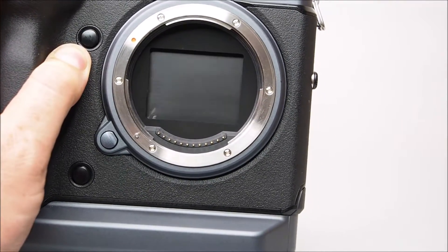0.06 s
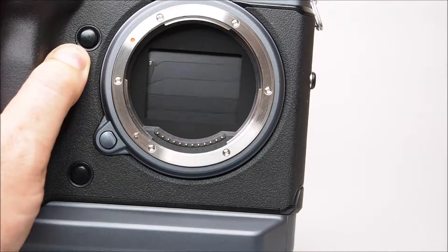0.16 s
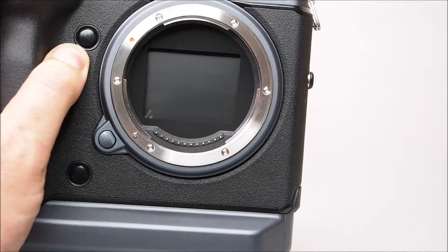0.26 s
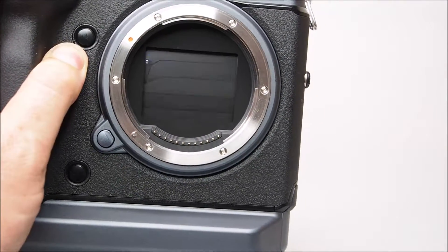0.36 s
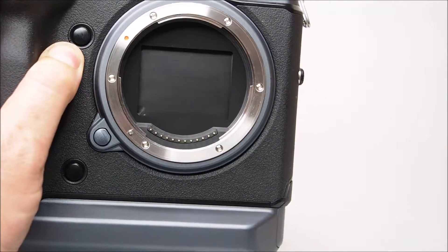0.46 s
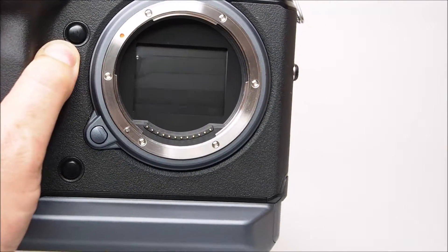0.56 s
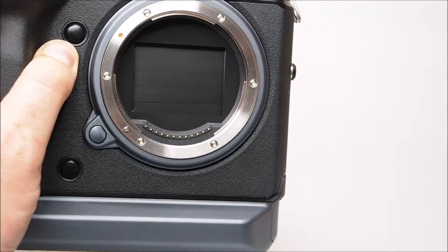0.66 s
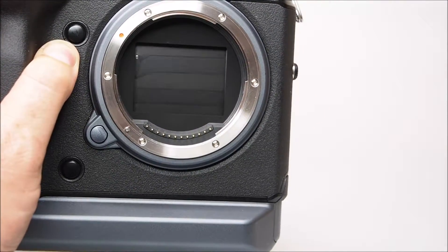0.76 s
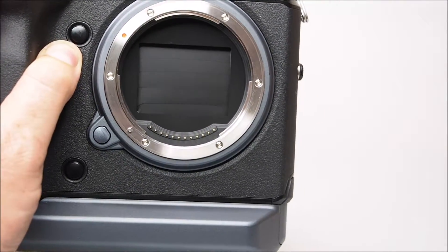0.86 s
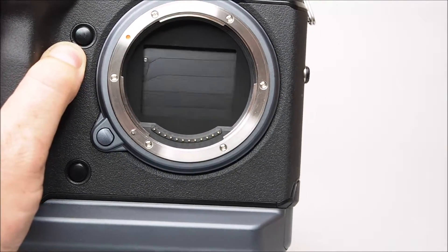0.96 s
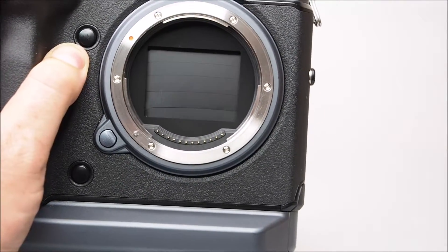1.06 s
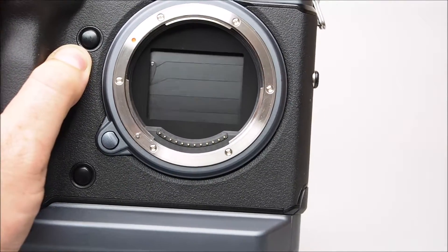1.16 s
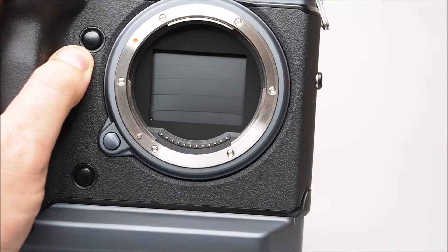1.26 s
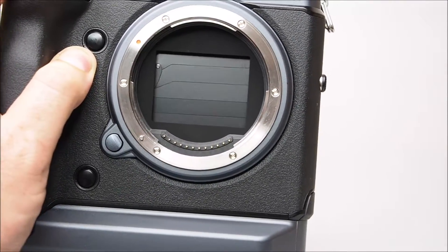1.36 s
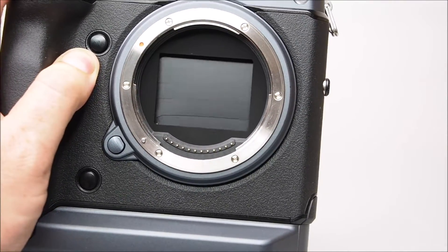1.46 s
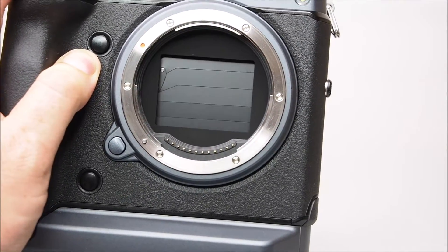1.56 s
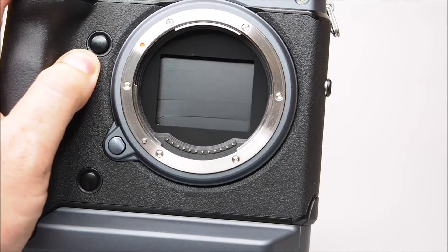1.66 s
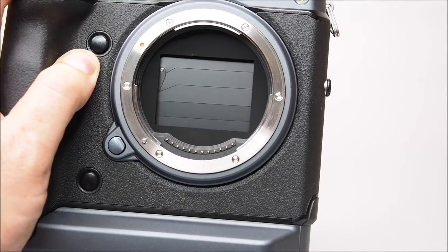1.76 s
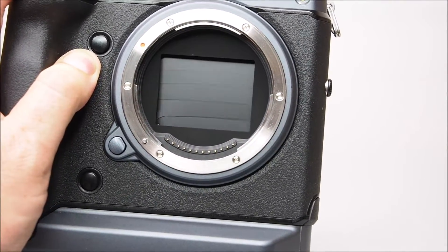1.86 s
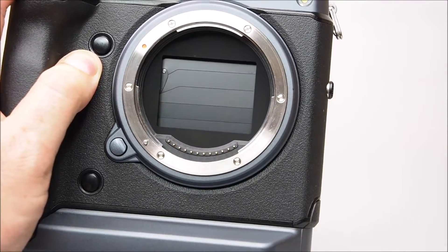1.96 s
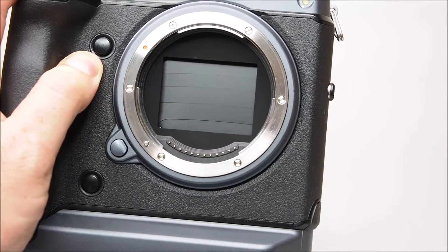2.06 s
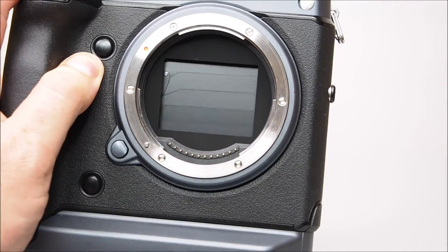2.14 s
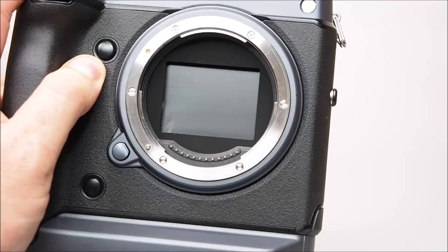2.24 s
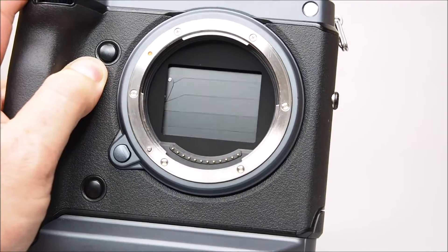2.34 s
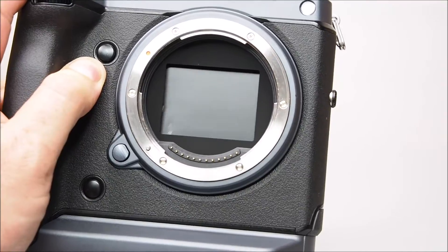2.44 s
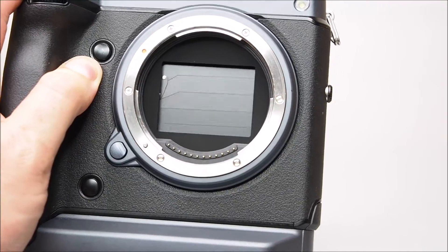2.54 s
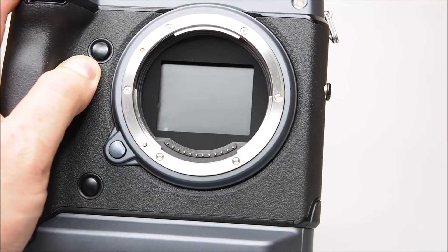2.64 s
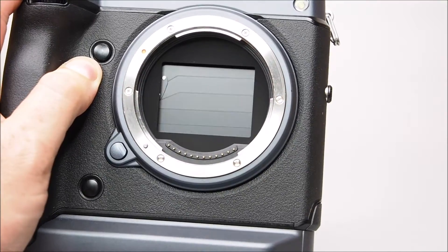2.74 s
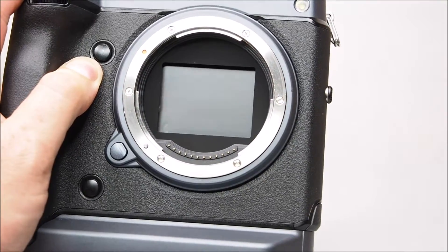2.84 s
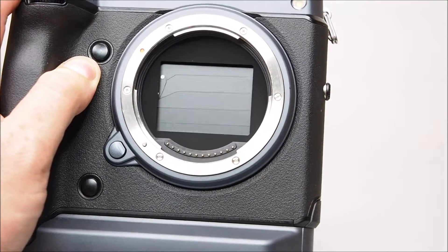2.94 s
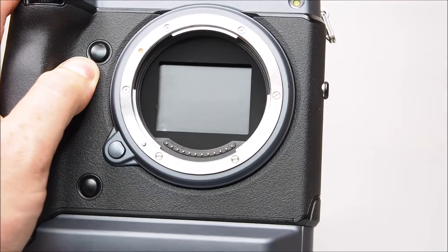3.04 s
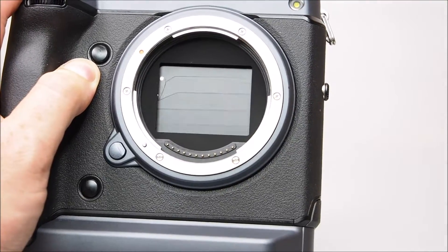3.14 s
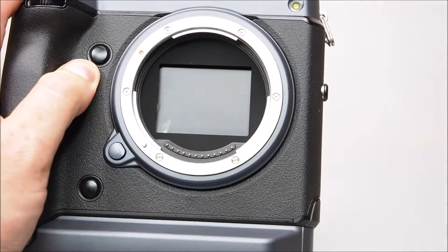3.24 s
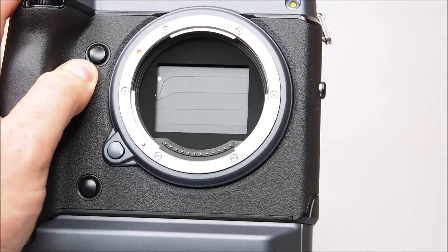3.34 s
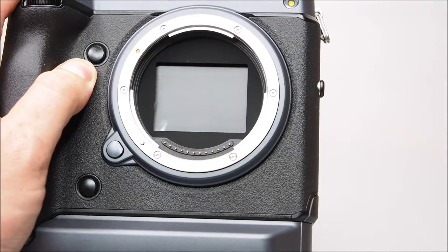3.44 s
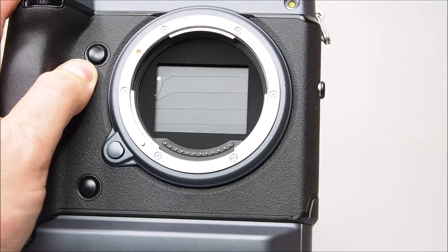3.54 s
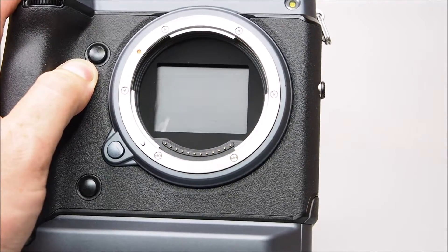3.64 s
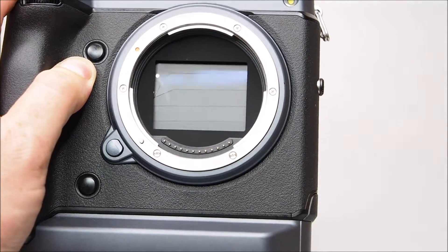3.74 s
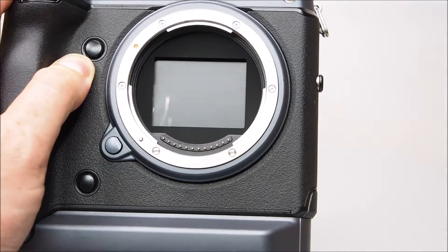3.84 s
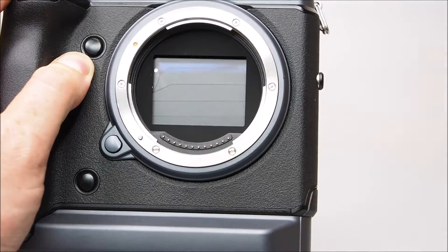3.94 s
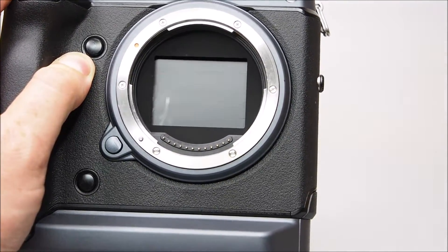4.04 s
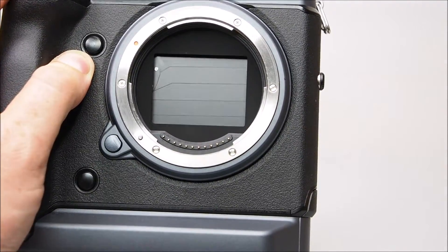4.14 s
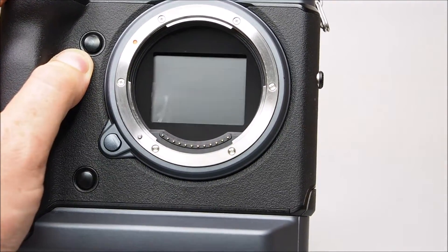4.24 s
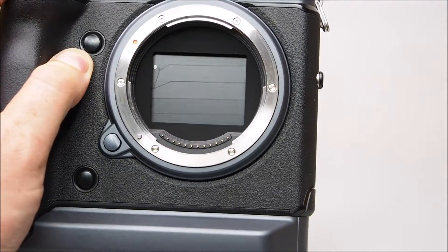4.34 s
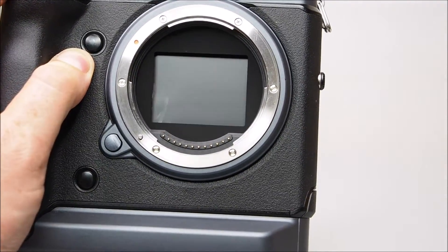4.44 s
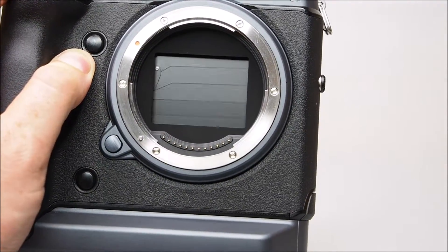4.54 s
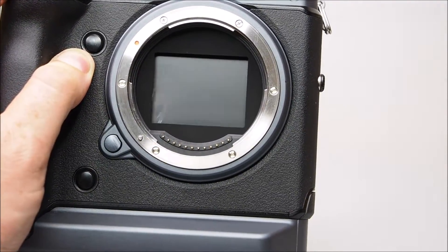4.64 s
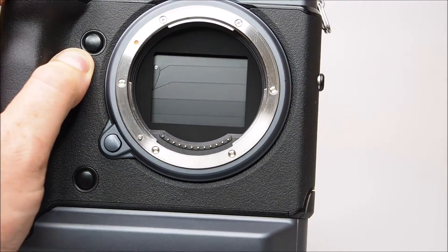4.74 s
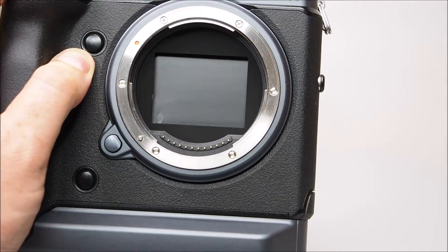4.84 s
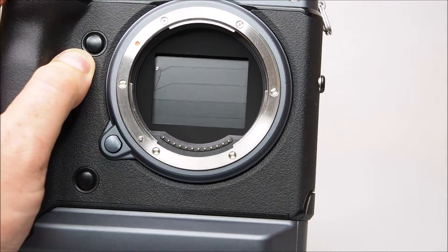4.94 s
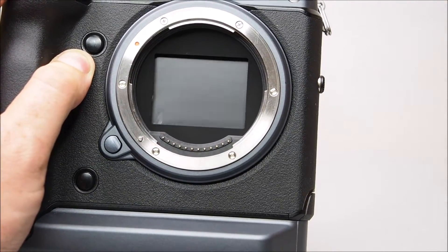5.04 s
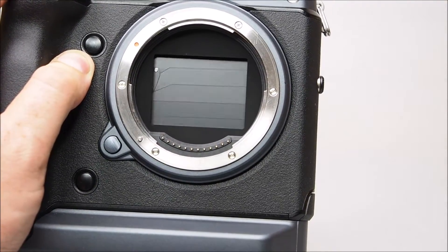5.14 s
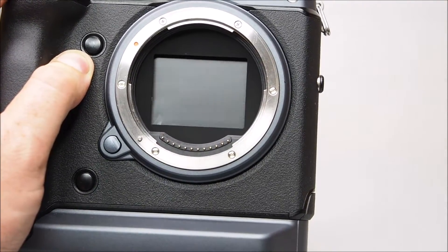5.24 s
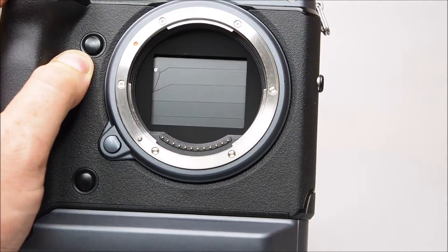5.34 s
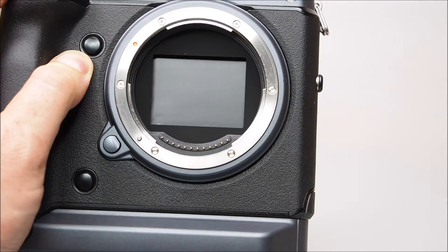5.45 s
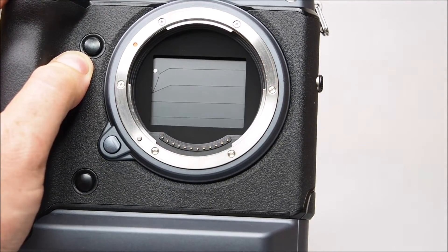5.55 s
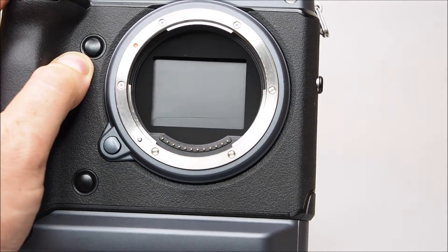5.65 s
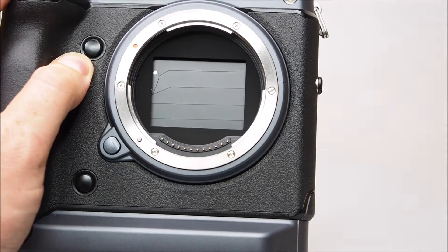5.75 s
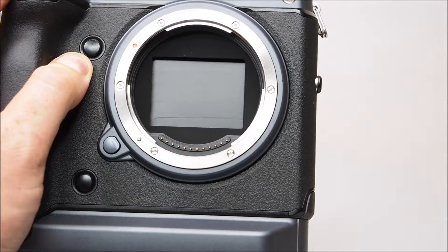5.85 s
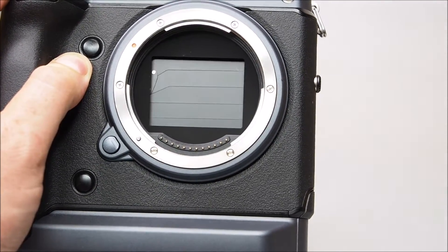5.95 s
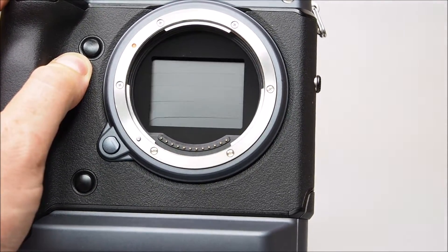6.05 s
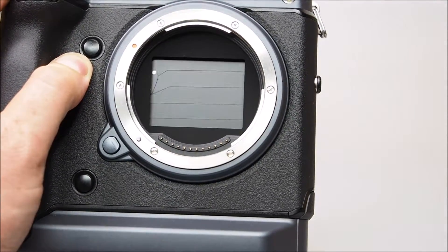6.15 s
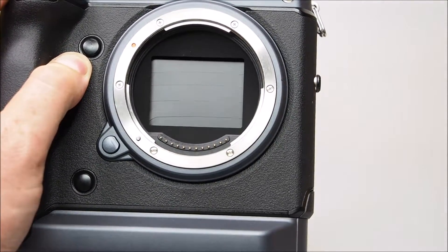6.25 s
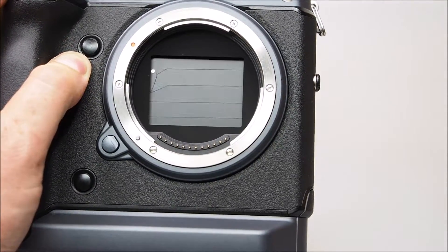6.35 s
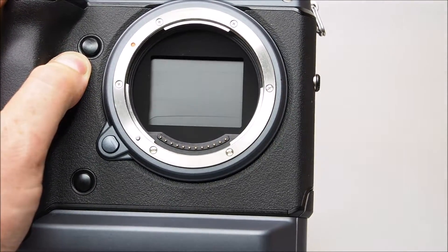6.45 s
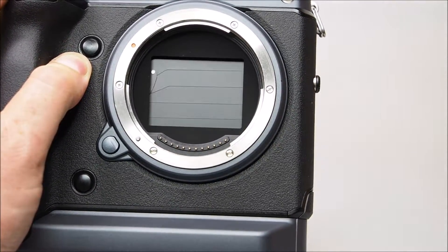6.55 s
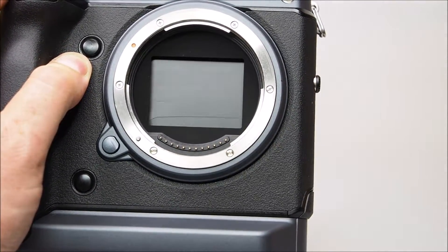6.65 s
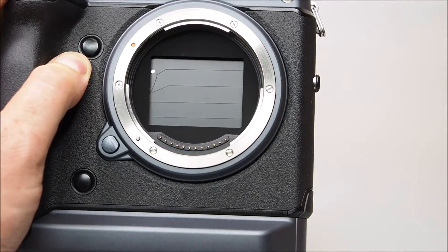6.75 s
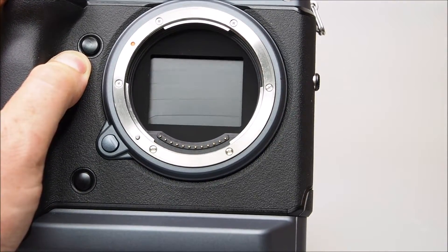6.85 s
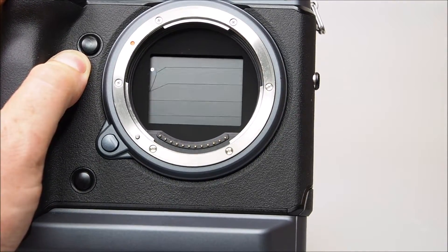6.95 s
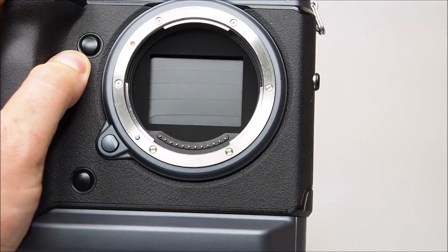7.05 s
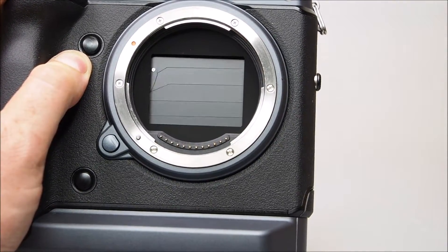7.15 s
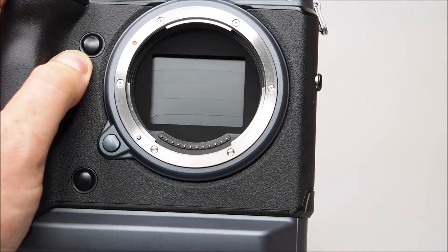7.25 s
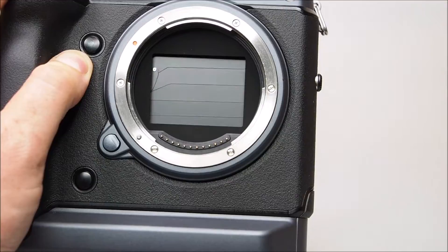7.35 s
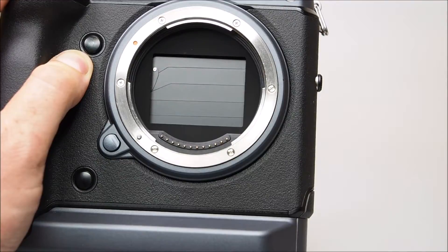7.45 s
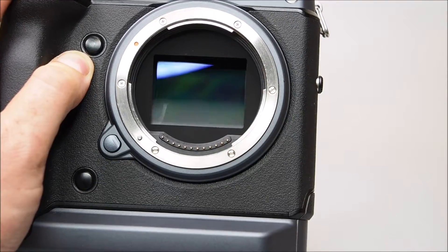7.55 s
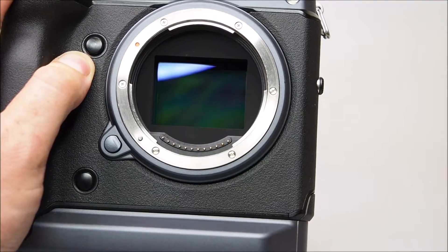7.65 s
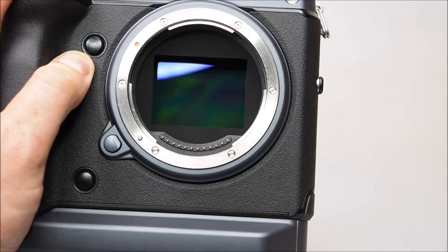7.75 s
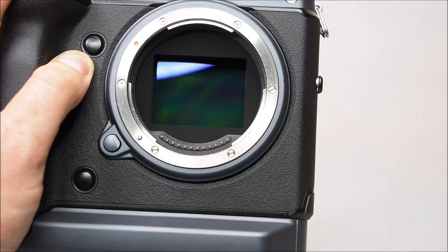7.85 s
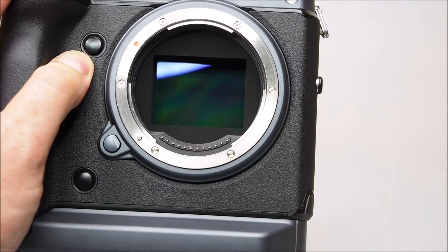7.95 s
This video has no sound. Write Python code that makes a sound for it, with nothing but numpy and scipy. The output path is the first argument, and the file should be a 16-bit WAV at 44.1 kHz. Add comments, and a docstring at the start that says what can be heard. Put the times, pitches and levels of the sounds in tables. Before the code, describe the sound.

A camera's mechanical shutter fires a steady burst, five sharp metallic clacks a second with tiny motor whirs between, then a click and short whir.

```python
"""A mirrorless camera with no lens fires its focal-plane shutter five times a second, close by in a small room.
For each frame a whining motor winds and latches the springs, the first curtain snaps away, and the second
slams shut and bounces. Later a catch lets go and the motor winds the shutter open.
Hits are short bursts of noise coloured by the camera body; the motor is a wavering tone over grainy noise.
Behind it lie rumble and hiss made of filtered noise, and a low humming tone."""
import sys
import numpy as np
from scipy import signal
from scipy.fft import rfft, irfft
from scipy.io import wavfile
from scipy.ndimage import uniform_filter1d, map_coordinates

SR = 44100
rng = np.random.default_rng(int(sys.argv[2]) if len(sys.argv) > 2 else 0)


def to_wav(sig):
    """Store sig (one row per channel, or 1-D mono) as 16-bit WAV at the path in sys.argv[1].

    Samples outside -1..1 are clipped; the rate is SR.
    """
    pcm = np.clip(np.atleast_2d(sig), -1, 1) * 32767
    pcm = np.round(pcm).astype(np.int16)
    wavfile.write(sys.argv[1], SR, pcm.T)  # frames by channels


N = 352800

# Timing: the beat has one more slam, a frame before the first one named here
FIRST_SLAM_S, FRAME_S, FRAME_COUNT = .1711, .1996, 37
# how far the slams run behind the even beat: t/s, lateness/ms
DRIFT = [(.17, -0.2), (.77, -2), (1.37, -1), (2.36, -6.5), (2.86, -6), (3.16, -2.5), (3.56, -1),
         (3.77, 6.5), (4.37, 4), (5.66, -1.93), (6.36, -0.5), (7.36, -0.1)]
MOTOR_AFTER_S, LATCH_AFTER_S = 0.076, .1453  # from a slam to the next motor start and spring latch
STOP_S, KNOCK_RISE_S = 0.00397, 0.0016  # from slam to cushioned stop; rise of the case's knock
OPEN_AFTER_S = .019  # from the catch to the opening stroke

# Hits: extra strength of each group, added to the levels in its table
SLAM_DB, BOUNCE_DB, LATCH_DB = -0.45, 1.07, -0.4
# metal contacts; t60 is the time to fade by 60 dB
# first curtain leaving: t/s from the slam, level/dB, t60/s
FIRST_CONTACTS = [(-.0099, -15, 0.0126), (-.0090, -18, 0.01), (-.0072, -16, .02), (-.0010, -41, .01)]
# second curtain slamming shut: t/s from the slam, level/dB, t60/s
SECOND_CONTACTS = [(0, -2.03, 0.0099), (.0008, -8, 0.013), (.0017, -10.5, 0.01)]
# second curtain bouncing: t/s from the slam, level/dB, t60/s
BOUNCE_CONTACTS = [(.0049, -18, 0.011), (.0058, -13.5, 0.016), (.0073, -18, 0.0135)]
# springs latching: t/s from the latch, level/dB, t60/s
LATCH_CONTACTS = [(-.0245, -21, 0.017), (-.0088, -16, 0.0122), (-.0018, -15, 0.013), (.0005, -17, 0.012)]
# catch letting go: t/s in the scene, level/dB, t60/s
CATCH_CONTACTS = [(7.5172, -19, 0.01), (7.5185, -12.5, 0.0067)]

# Colour of each part before the body shapes it; only the relative levels matter
# first curtain: f/Hz, level/dB per Hz
FIRST_TONE = [(60, -25), (430, -19), (900, -17.5), (1600, -18.5), (2800, -6.5), (4200, -3.5), (5700, -8),
              (7600, -5), (9500, -10), (12000, -8), (15500, -11.5)]
# second curtain: f/Hz, level/dB per Hz
SECOND_TONE = [(60, -79), (430, -20.5), (1000, -20), (2100, -22.5), (2900, -4.5), (3800, -17), (4900, -8),
               (5600, -1.5), (6200, -4), (7200, -3.5), (8500, -6), (9500, -16.5), (12000, -11),
               (15500, -18)]
# bounce: f/Hz, level/dB per Hz
BOUNCE_TONE = [(60, -16.5), (430, -23.5), (1100, -8), (2000, -3.5), (2800, -2.5), (4000, 0), (5700, -4.5),
               (7000, -10), (8500, -5.5), (9600, -3.5), (13000, -13), (15500, -20.5)]
# latch: f/Hz, level/dB per Hz
LATCH_TONE = [(60, -22), (430, -16.5), (800, -9.5), (1600, -23), (2200, -7.5), (3050, -5.5), (4300, -5),
              (5300, -2), (5950, 0), (7000, -3.5), (8400, -1.5), (9700, -8), (12200, -8), (15500, -19.5)]
# catch: f/Hz, level/dB per Hz
CATCH_TONE = [(200, -40), (1400, -39), (2000, -13), (2700, -24.5), (3400, -16.5), (4500, -15), (5600, -6.5),
              (6150, 2), (6800, -14.5), (8500, -10), (15000, -14)]
# gear noise: f/Hz, level/dB per Hz
GEAR_TONE = [(60, -21.5), (430, -11.5), (800, -11), (1600, -8), (2300, -5.5), (3000, -4), (4300, -3.5),
             (5800, -1.5), (7000, -5.5), (8300, -2.5), (9700, -7.5), (12200, -4.5), (15500, -10)]
# peaks and hollows on the way from the open lens mount to the microphone: f/Hz, width/Hz, level/dB
BODY = [(199, 65, -4.5), (394, 54, 1), (590, 62, -5), (693, 23.1, -6), (805, 64, 2.5), (1180, 46, 1),
        (1278, 41, -5.5), (1657, 115, -3.5), (2260, 120, -3.5), (3520, 100, 1), (3970, 99, -1),
        (5520, 110, 3), (6490, 154, -6.5), (10360, 320, -7)]
# ringing modes of the camera's case: f/Hz, level/dB, t60/s
CASE_MODES = [(338.5, -7, 0.07), (435, 0.5, 0.041), (638, -5, 0.034), (824, -12.5, 0.076), (935, -14, 0.02),
              (1206, -1, 0.07), (1450, -5.5, 0.094), (2077, -10, 0.057)]
BASS_CUT_HZ, TOP_HZ = 197, 15900  # so small a body radiates little bass; upper band limit

# Motor strokes: rise, moment of heaviest load and running time (attack, load, length)/s,
# share of speed lacking at the start (slow), levels of whine and gear noise (whine, rasp)/dB
# winding the springs
COCKING_STROKE = dict(attack_s=.018, load_s=.044, length_s=.075, slow=.22, whine_db=-30.5, rasp_db=-32.5)
# winding the shutter open
OPENING_STROKE = dict(attack_s=0.014, load_s=.04, length_s=0.061, slow=0.0098, whine_db=-25.5, rasp_db=-29.5)
FREE_MESH_HZ, SAG_HZ, LOAD_WIDTH_S = 2988, 239, 0.0161  # free-running gear pitch, its dip under load
SPIN_UP_S = .017  # how quickly the motor comes up to speed
ATTACK_DB, STOP_T60_S = 13, 0.029  # swell at the start; fade after the motor stops
WHINE_FADE_DB, RASP_GROWTH_DB = 4, 4  # as the springs tighten, whine gives way to rasp
# how strongly the gears radiate each overtone: f/Hz, level/dB
OVERTONES = [(2450, -13), (2680, -4.5), (2830, 1.5), (3100, -4), (5100, -2.5), (5550, -3), (6200, 0),
             (7600, -35.5), (8400, -12.5), (11500, -19.5)]

# Left and right
# likeness of the two sides for hits and gear noise: f/Hz, likeness 0-1
ALIKE = [(100, 1), (1500, 1), (2300, 0.77), (2900, 0.98), (4000, 0.39), (6000, 0.91), (7500, 0.59),
         (9000, 0.19), (12000, 0.42), (14000, 0.19)]
# left level minus right level: f/Hz, difference/dB
BALANCE = [(1000, -0.1), (2050, 1), (2550, -4.5), (3350, 1), (3800, -1), (5300, 0.5), (6100, 0.5),
           (6650, 7), (7300, 2), (8050, -2), (9000, 2), (11500, 1), (14500, 2.5)]

# Room
# how long its echoes last: f/Hz, t60/s
ROOM_T60 = [(200, 0.2), (450, 0.27), (850, 0.301), (1500, 0.19), (2800, 0.23), (4500, 0.2), (8000, 0.19),
            (15000, 0.19)]
# colour of its echoes: f/Hz, relative level/dB
ROOM_TONE = [(100, -3), (400, 4.5), (800, 6), (2200, 3), (2850, 0.5), (3500, 3.5), (4700, 2.5), (5600, 0),
             (6300, -1.5), (8000, 1), (15000, 1)]
# likeness of the two sides of its echoes: f/Hz, likeness 0-1
ROOM_ALIKE = [(300, 0.96), (1200, 0.77), (2300, 0.343), (4500, .05)]
# colour of its rumble and hiss: f/Hz, relative level/dB per Hz
AIR_TONE = [(12, -29), (20, 8.5), (27, -6.5), (66, 0.5), (144, -2.5), (219, -1), (298, -10), (491, -11.5),
            (581, -15), (1040, -16), (1580, -23.5), (5380, -24.5), (15500, -40)]
AIR_DB = -56  # before the rise
RISE_DB, RISE_AT_S, RISE_S = 9.5, 7.45, 0.17  # lifts air and hum alike after the burst
HUM_HZ, HUM_DB, HUM_WAVER_DB = 64, -67, 3  # level before waver, swell and rise
HUM_SWELL_DB, HUM_SWELL_AT_S, HUM_SWELL_S = 12, 6.64, 0.25

SHOT, LEAD = SR // 2, SR // 7  # samples that hold one frame's sound; of them, before the slam
CLOCK = (np.arange(SHOT) - LEAD) / SR  # seconds from the slam


def amp(db):
    """Turn decibels into gain."""
    return 10 ** (np.asarray(db) / 20)


def unit(x):
    """Scale to an average strength (rms) of 1."""
    return x / np.sqrt(np.mean(x ** 2) + 1e-20)


def along(points, hz):
    """Read a table of (frequency, value) with the frequency on a log axis."""
    f, v = np.transpose(points)
    return np.interp(np.log(hz + 1), np.log(f), v)


def bins(size):
    """Frequencies in the spectrum of a sound of size samples."""
    return np.fft.rfftfreq(size, 1 / SR)


def wobble(rate, size):
    """A smooth random curve through rate random points a second."""
    points = rng.standard_normal(int(size * rate / SR) + 4)
    return map_coordinates(points, [np.arange(size) * rate / SR])


def even(pair, size):
    """Level out the random peaks of a noise spectrum over size bins."""
    z = rfft(pair)
    power = np.abs(uniform_filter1d(np.abs(z) ** 2, size=size, axis=1))
    return irfft(z / np.sqrt(power))


def spread(pair, alike):
    """Mix two unrelated signals into left and right with a given likeness."""
    turn = np.arccos(np.clip(along(alike, bins(pair.shape[1])), -1, 1)) / 2
    mid, side = rfft(pair) * [np.cos(turn), np.sin(turn)]
    return irfft([mid + side, mid - side])


def add(track, sound, s):
    """Mix a sound into the track from time s on, cutting off what lies outside."""
    start = round(s * SR)
    lo, hi = max(start, 0), min(start + sound.shape[1], N)
    track[:, lo:hi] += sound[:, lo - start:hi - start]


def background():
    """Rumble and hiss of filtered noise under a low wavering hum; the hum swells once, and both rise late."""
    t = np.arange(N) / SR
    air = irfft(rfft(rng.standard_normal((2, N))) * amp(along(AIR_TONE, bins(N))))
    air = unit(spread(air, [(100, 0.89), (1000, 0.74), (4000, 0.18)]))  # f/Hz, likeness
    hum = unit(np.sin(2 * np.pi * HUM_HZ * t + .8 * wobble(10, N)))
    swell = np.exp(-((t - HUM_SWELL_AT_S) / HUM_SWELL_S) ** 2)
    hum_db = HUM_DB + HUM_WAVER_DB * wobble(3, N) + HUM_SWELL_DB * swell
    risen = np.clip((t - RISE_AT_S) / RISE_S, 0, 1)
    return amp(RISE_DB * risen) * (amp(AIR_DB) * air + amp(hum_db) * hum)


def slam_times():
    """An even beat that drifts by a few milliseconds, already under way at the start."""
    beat = FIRST_SLAM_S + FRAME_S * np.arange(-1, FRAME_COUNT)
    return beat + np.interp(beat, *np.transpose(DRIFT)) / 1000


def through_body(tone):
    """Filter from a part through the body to each side, of unit power, reacting only after a hit."""
    hz = bins(SHOT)
    db = along(tone, hz) + sum(g / (1 + ((hz - f) / w) ** 4) for f, w, g in BODY)
    db = db - 10 * np.log10(1 + (BASS_CUT_HZ / (hz + 20)) ** 4)
    sides_db = db + np.outer([.5, -.5], along(BALANCE, hz))
    gain = unit(amp(sides_db) * np.where(hz < TOP_HZ, 1, .1))
    # folding the cepstrum (spectrum of the log spectrum) puts the response after the hit
    cepstrum = irfft(np.log(gain))
    cepstrum[:, 1:SHOT // 2] *= 2
    cepstrum[:, SHOT // 2:] = 0
    return np.exp(rfft(cepstrum))


def ring(t60):
    """Thin blades have many evenly strong modes, so they ring like noise that dies in milliseconds."""
    fade = amp(-60 * np.arange(SR // 10) / SR / t60)
    burst = even(rng.standard_normal((2, len(fade))) * fade, size=31)
    strength = np.sqrt(np.mean(fade ** 2))
    return spread(unit(burst) * strength, ALIKE)[:, :len(fade) // 2]


def part(contacts, tone, fresh, scatter_s, scatter_db):
    """A moving part: gives a function that strikes it; fresh is the share of each hit's power that is new."""
    response = through_body(tone)
    usual_rings = [ring(t60) for _, _, t60 in contacts]

    def strike(shift=0):
        """Hit every contact, with small random changes of time and level."""
        out = np.zeros((2, SHOT))
        for (s, db, t60), usual in zip(contacts, usual_rings):
            blow = np.sqrt(1 - fresh) * usual + np.sqrt(fresh) * ring(t60)
            start = LEAD + round((s + shift + scatter_s * rng.standard_normal()) * SR)
            level = amp(db + scatter_db * rng.standard_normal())
            out[:, start:start + blow.shape[1]] += level * blow
        return irfft(rfft(out) * response)
    return strike


def knock(s, db, soft_hz, scatter_db=2):
    """A blow at time s rings the case, alike on both sides; a cushioned one weakens modes above soft_hz."""
    t = np.maximum(CLOCK - s, 0)
    modes = 0
    for hz, level, t60 in CASE_MODES:
        fade = amp(level + scatter_db * rng.standard_normal() - 60 * t / t60)
        modes = modes + fade * np.cos(2 * np.pi * hz * t) / np.sqrt(1 + (hz / soft_hz) ** 4)
    return amp(db) * modes * (1 - np.exp(-t / KNOCK_RISE_S))


def room_tail(build_s=0.0046):
    """Blurred echoes of the room: noise in which each frequency dies at its own speed."""
    hz, t, z = signal.stft(rng.standard_normal((2, SHOT)), SR, nperseg=256)
    fading = z * amp(-60 * t / along(ROOM_T60, hz)[:, None])
    tail = signal.istft(fading, SR, nperseg=256)[1][:, :SHOT]
    age = np.arange(SHOT) / SR
    window = (1 - np.exp(-(age / build_s) ** 2)) * (age < age[-1] * 3 / 4)
    tail = irfft(rfft(even(tail * window, size=41)) * amp(along(ROOM_TONE, bins(SHOT))))
    return spread(unit(tail), ROOM_ALIKE) * window / np.sqrt(SHOT)


def in_room(sound, walls, wet_db, moved):
    """Add echoes; the hand shifts the camera a little, so a share (moved) of their power is new each time."""
    tail = np.sqrt(1 - moved) * walls + np.sqrt(moved) * room_tail()
    return sound + amp(wet_db) * signal.fftconvolve(sound, tail, axes=1)[:, :SHOT]


def motor(age, stroke, gears, waver, flutter_db, grain_db):
    """The motor spins up, slows against the springs and stops; gear teeth mesh in a whine over grainy rasp."""
    speed = 1 - stroke["slow"] * np.exp(-(age / SPIN_UP_S) ** 2)
    load = np.exp(-((age - stroke["load_s"]) / LOAD_WIDTH_S) ** 2)
    mesh_hz = FREE_MESH_HZ * speed - SAG_HZ * load
    rising = np.clip(1 - age / stroke["attack_s"], 0, 1)
    stopped_s = np.maximum(age - stroke["length_s"], 0)
    drive = amp(-ATTACK_DB * rising - 60 * stopped_s / STOP_T60_S) * (age > 0)

    phase = 2 * np.pi * np.cumsum(mesh_hz * (1 + waver * wobble(497.6, SHOT))) / SR
    side_phase = phase + np.array([[.45], [0]])  # left runs ahead, in radians
    whine = 0
    for k in range(1, 5):  # the gear pitch and three overtones
        level_db = along(OVERTONES, k * mesh_hz) + flutter_db * wobble(297.0, SHOT)
        whine = whine + amp(level_db) * np.sin(k * side_phase)
    whine = whine * amp([[-.7], [.7]])  # a little louder on the right

    teeth = rng.standard_normal((2, SHOT)) * amp(grain_db * wobble(1500, SHOT))
    rasp = irfft(rfft(spread(unit(teeth), ALIKE)) * gears)
    tension = np.clip(age / stroke["length_s"], 0, 1)
    whine_db = stroke["whine_db"] - WHINE_FADE_DB * tension
    rasp_db = stroke["rasp_db"] + RASP_GROWTH_DB * tension
    return drive * (amp(whine_db) * whine + amp(rasp_db) * rasp)


def burst(track, walls, gears):
    """Wind, latch, release, slam and bounce for every frame; each slam sets the next winding's time."""
    first = part(FIRST_CONTACTS, FIRST_TONE, fresh=0.49, scatter_s=.00001, scatter_db=0.1)
    second = part(SECOND_CONTACTS, SECOND_TONE, fresh=0.14, scatter_s=.00001, scatter_db=1.5)
    bounce = part(BOUNCE_CONTACTS, BOUNCE_TONE, fresh=0.88, scatter_s=.00015, scatter_db=1.0)
    latch = part(LATCH_CONTACTS, LATCH_TONE, fresh=0.71, scatter_s=.0003, scatter_db=1.0)
    slams = slam_times()
    gaps_s = np.diff(slams, prepend=slams[0] - FRAME_S)  # since the slam before
    for s, gap_s in zip(slams, gaps_s):
        motor_age = CLOCK + gap_s - MOTOR_AFTER_S
        winding = motor(motor_age, COCKING_STROKE, gears, waver=0.0257, flutter_db=3.5, grain_db=4.0)
        latch_s = LATCH_AFTER_S - gap_s  # counted from this frame's slam
        latching = amp(LATCH_DB) * latch(latch_s) + knock(latch_s, db=-45.5, soft_hz=2000)
        landing = amp(SLAM_DB) * second() + amp(BOUNCE_DB) * bounce()
        landing = landing + knock(STOP_S, db=-33, soft_hz=700)
        frame = winding + latching + first() + landing
        add(track, in_room(frame, walls, wet_db=-6.5, moved=0.67), s + CLOCK[0])


def opening(track, walls, gears):
    """A catch lets go with a click, then the motor winds the shutter open."""
    catch = part(CATCH_CONTACTS, CATCH_TONE, fresh=0, scatter_s=0, scatter_db=0)
    release_s = CATCH_CONTACTS[0][0]
    motor_age = CLOCK - OPEN_AFTER_S
    winding = motor(motor_age, OPENING_STROKE, gears, waver=0.0184, flutter_db=5.5, grain_db=2.0)
    sound = catch(-release_s) + winding
    add(track, in_room(sound, walls, wet_db=-8.5, moved=0.62), release_s + CLOCK[0])


def shutter():
    """The burst and the opening share one track, one room and one gear train."""
    track, walls, gears = np.zeros((2, N)), room_tail(), through_body(GEAR_TONE)
    burst(track, walls, gears)
    opening(track, walls, gears)
    return track


def scene():
    """The shutter over the quiet room."""
    return shutter() + background()


def record(dry, top=0.88):
    """Round off peaks towards top, let left lead by half a sample, and pass nothing above the band limit."""
    squeezed = dry / (1 + np.abs(dry / top) ** 4) ** (1 / 4)
    early = np.exp(1j * np.pi * np.outer([.5, -.5], bins(N)) / SR)
    return irfft(rfft(squeezed) * early * (bins(N) < TOP_HZ), N)


dry = scene()
out = record(dry)
to_wav(out)
```